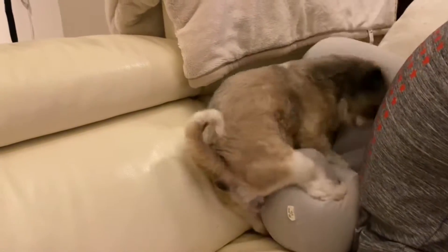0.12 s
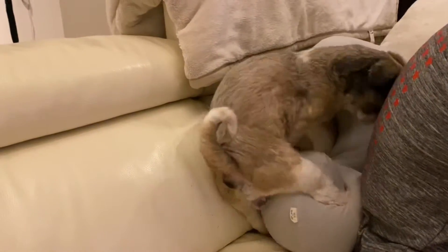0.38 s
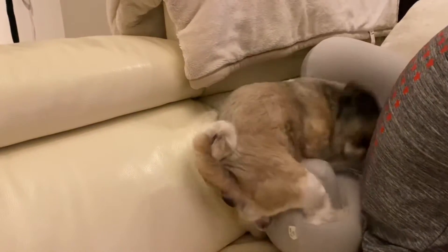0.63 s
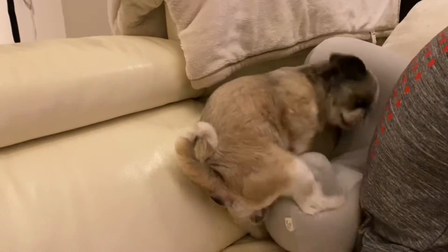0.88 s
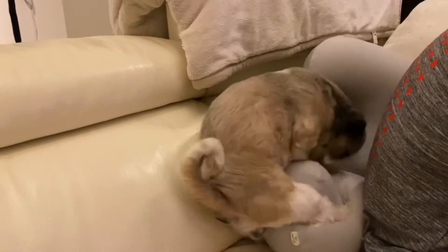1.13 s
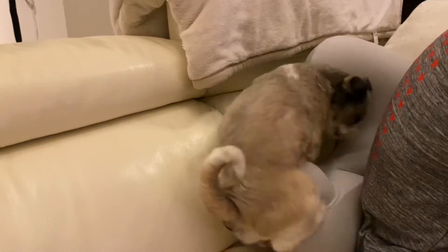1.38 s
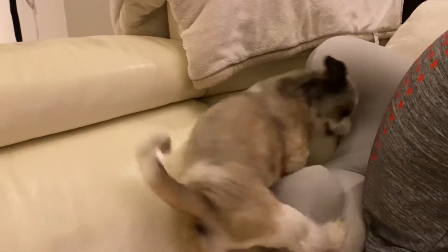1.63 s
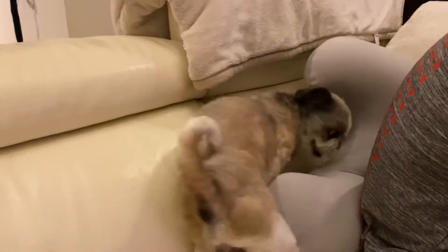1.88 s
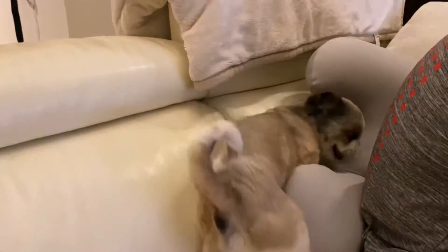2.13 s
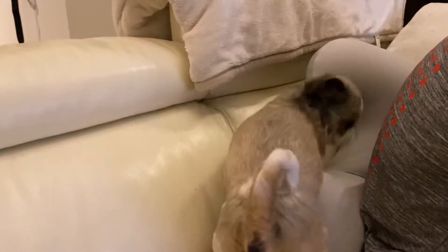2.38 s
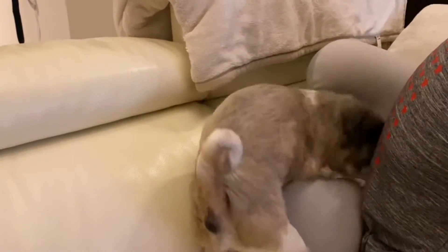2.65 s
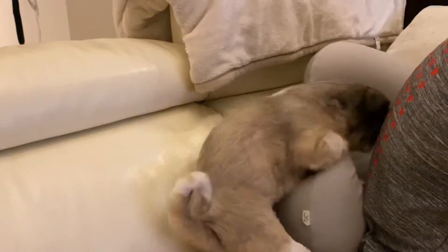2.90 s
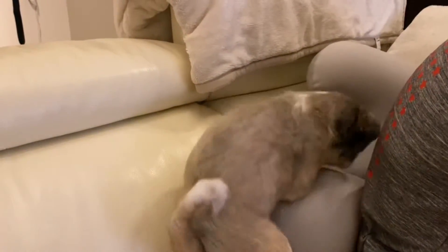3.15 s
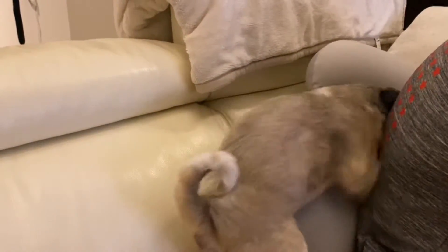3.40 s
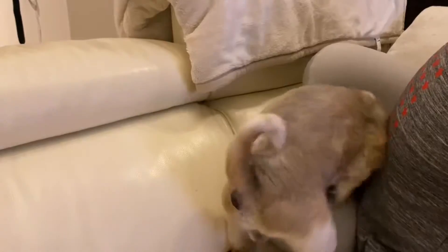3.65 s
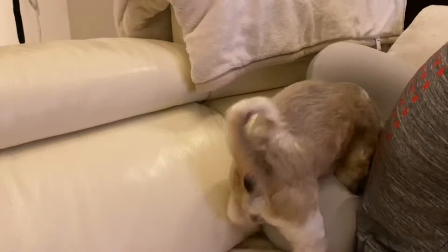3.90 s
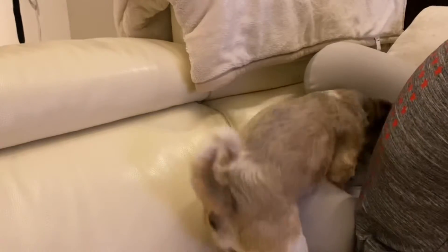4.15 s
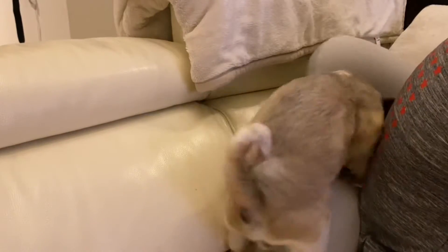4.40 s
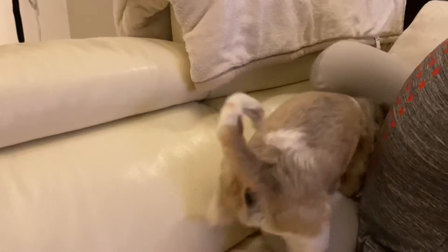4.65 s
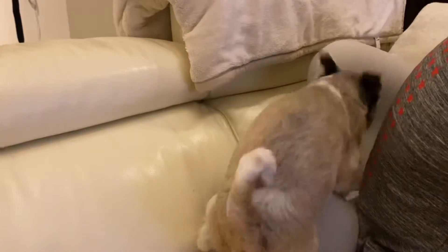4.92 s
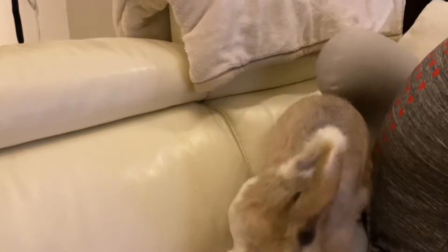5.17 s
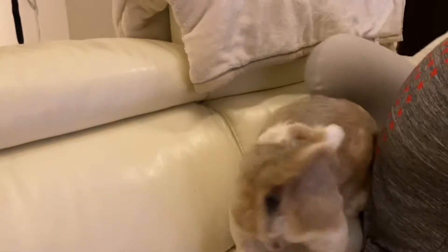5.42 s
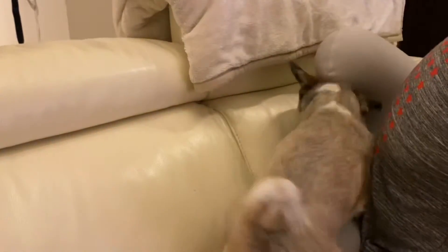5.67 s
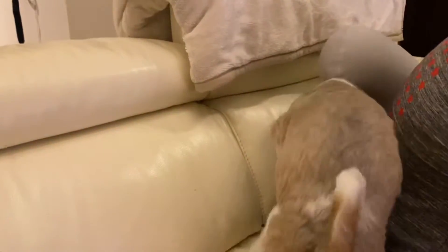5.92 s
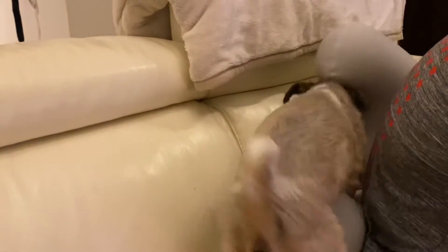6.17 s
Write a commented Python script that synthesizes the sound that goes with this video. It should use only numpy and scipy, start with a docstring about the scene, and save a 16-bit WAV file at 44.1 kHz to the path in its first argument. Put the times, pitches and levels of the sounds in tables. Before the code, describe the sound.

A small dog scrabbles on a leather sofa, close to a phone in a quiet, dry room with faint low noise. From 0.1 s a flurry of dull knocks, each dropping quickly in pitch, mixes with gritty claw catches and a soft nasal huff, easing after 0.5 s, with another small cluster at 0.8 s. Airy fur hiss and muffled leather crumpling swell and fade throughout over the seat's low rumble. Heavier thumps come at 1.6 to 1.8 s with a short huff, a sharper claw knock at 2.4 s, then a dense volley from 2.8 to 3.0 s, ending in a crisp knock, and a huff at 3.1 s. Lighter taps follow at 3.4 to 3.8 s. The strongest, deep thud lands at 4.0 s. Sparser rustling continues, with a knock at 5.2 s, a strong thump at 6.0 s and a last quiet huff at 6.2 s.

```python
"""A small dog paws a cushion on a leather sofa, close to a phone with two microphone ports; 6.3 s.
Throughout: filtered-noise room; seat swaying at low resonances; strokes of fur hiss and leather crumple.
0.1 s: a flurry of falling knocks (decaying sweeps) and claw catches (resonant noise bursts), a nasal huff.
1.6-3.0 s: heavier knocks, a dense volley near 2.9 s, more huffs (noise through two resonances).
4.0 s: the strongest knock; then sparser blows, one strong at 6.0 s, and a last huff at 6.2 s."""
import sys
import numpy as np
from scipy import signal
from scipy.fft import rfft, irfft, next_fast_len
from scipy.io import wavfile
from scipy.ndimage import uniform_filter1d

SR = 44100
rng = np.random.default_rng(int(sys.argv[2]) if len(sys.argv) > 2 else 0)


def log_audio(samples):
    """Write samples as a 16-bit WAV file to the path given in sys.argv[1]."""
    # one column per channel
    frames = np.atleast_2d(samples).T
    # limit to full scale, then quantise
    limited = np.clip(frames, -1, 1)
    pcm = np.round(limited * 32767).astype(np.int16)
    wavfile.write(sys.argv[1], SR, pcm)


def decibels_to_gain(level_db):
    """Convert a level in decibels to a linear amplitude gain (20 dB per decade)."""
    exponent = np.asarray(level_db, float) / 20
    return 10 ** exponent


N = 277609


def evened(x):
    """Scales to rms 1."""
    return x / np.sqrt(np.mean(x ** 2) + 1e-20)


def over_hz(points, hz):
    """Reads a table on a log-frequency axis."""
    f, value = np.transpose(points)
    return np.interp(np.log(hz + 1), np.log(f + 1), value)


def coloured(x, gain):
    """Filters by a gain that is a function of frequency."""
    size = next_fast_len(N + SR)
    hz = np.fft.rfftfreq(size, 1 / SR)
    return irfft(rfft(x, size) * gain(hz), size)[..., :N]


def shaped(x, points):
    """Filters by a table of f/Hz, level/dB; rms 1."""
    return evened(coloured(x, lambda hz: decibels_to_gain(over_hz(points, hz))))


def patchy(x, size, patchy_db, tilt_db, share):
    """Short-time spectra waver in random patches; tilt_db leans them over time, by share in each band."""
    hz, t, z = signal.stft(x, SR, nperseg=size, noverlap=size * 3 // 4)
    patches = rng.standard_normal(z.shape[1:])
    patches = uniform_filter1d(patches, size=8, axis=0)
    patches = evened(uniform_filter1d(patches, size=16, axis=1))
    tilt = np.interp(t, np.arange(N) / SR, tilt_db) * over_hz(share, hz)[:, None]
    z = z * decibels_to_gain(patchy_db * patches + tilt)
    return signal.istft(z, SR, nperseg=size, noverlap=size * 3 // 4)[1][:, :N]


# room and microphone noise spectrum: f/Hz, relative density/dB
ROOM = [(22, -30), (40, -4), (62, 8), (150, -9), (400, -17.5), (1000, -16), (3000, -17), (6000, -29.5),
        (14000, -32)]
ROOM_RMS_DB = -55.5


def room():
    """Steady quiet of the room and the microphone: stationary shaped noise."""
    return decibels_to_gain(ROOM_RMS_DB) * shaped(rng.standard_normal((2, N)), ROOM)


# huffs through the nose: start/s, length/s, level/dB, lower resonance f/Hz, upper resonance relative level/dB
HUFFS = [(0.129, 0.28, -51, 1870, 0), (1.702, .12, -47.5, 2030, -17), (2.32, 0.083, -56, 1880, -2),
         (3.131, 0.11, -50, 1900, -4), (3.804, .08, -61, 1900, -17), (6.204, .09, -55, 1700, -12)]
UPPER_RATIO = 1.95  # upper over lower resonance frequency


def huffs():
    """Air rushing through the nostrils, coloured by two soft resonances."""
    out = np.zeros((2, N))
    for start_s, length_s, db, low_hz, high_db in HUFFS:
        size = round(length_s * SR)
        hz = np.fft.rfftfreq(size, 1 / SR)
        lower = 1 / (1 + ((hz - low_hz) / 300) ** 2)
        upper = decibels_to_gain(high_db) / (1 + ((hz - UPPER_RATIO * low_hz) / 380) ** 2)
        noise = rng.standard_normal((2, SR // 2))[:, :size]
        air = evened(irfft(rfft(noise) * (lower + upper), size))
        out[:, round(start_s * SR):][:, :size] += decibels_to_gain(db) * air * signal.windows.tukey(size, .6)
    return out


# weight shifting on the seat: t/s, level/dB
WEIGHT = [(0.04, -55), (.12, -40), (.3, -43.5), (.4, -39), (.55, -49), (.8, -47.5), (.93, -56),
          (1.2, -45.5), (1.37, -57), (1.52, -39.5), (1.8, -40), (2.05, -55), (2.45, -46.5), (2.85, -36.5),
          (3.15, -44), (3.7, -42), (3.9, -46.5), (4.08, -39), (4.3, -45.5), (4.8, -50.5), (4.9, -46),
          (5.2, -41), (5.33, -45.5), (5.6, -51), (5.95, -46), (6.29, -42)]
SETTLE_DB, SETTLE_T60_S, DEEP_HZ = -19, 0.36, 110  # level re blow peak; decay; blows below DEEP_HZ count


def weight():
    """Slow shifts of weight, plus the settling after deep blows, summed as power: dB."""
    kicks = np.zeros(N)
    for s, db, hz, *_ in BLOWS:
        kicks[round(s * SR)] += decibels_to_gain(db + SETTLE_DB) ** 2 * (hz < DEEP_HZ)
    settling = signal.lfilter([1], [1, -10 ** (-6 / (SETTLE_T60_S * SR))], kicks)
    shifts_db = np.interp(np.arange(N) / SR, *np.transpose(WEIGHT))
    return 10 * np.log10(decibels_to_gain(shifts_db) ** 2 + settling)


# seat resonances: f/Hz, width/Hz, relative level/dB
SEAT = [(63.5, 23.4, 0.5), (100, 29, -1), (133.6, 40, -8), (40, 14, -8)]
SHOVES_PER_S = 300


def sway():
    """Shifting weight keeps shoving the seat, which hums at its low resonances."""
    size = decibels_to_gain(2.1 * np.minimum(rng.exponential(1, N), 4))
    shoves = rng.standard_normal((2, N)) * size * (rng.random(N) < SHOVES_PER_S / SR)
    seat = lambda hz: sum(decibels_to_gain(db) / (1 + 2j * (hz - f) / width) ** 2 for f, width, db in SEAT)
    return evened(coloured(shoves, seat)) * decibels_to_gain(weight())


# paw strokes: peak t/s, fur hiss level/dB, leather crumple level/dB, 10 dB rise/s, 10 dB fall/s
STROKES = [(0.105, -50.6, -41.5, 0.12, 0.151), (0.238, -47.3, -41.5, 0.036, 0.052),
           (0.369, -48.7, -47.9, 0.3, 0.02), (0.426, -42.9, -45.4, 0.035, 0.041),
           (0.491, -66.0, -41.5, 0.137, 0.05), (0.515, -45.1, -45.8, 0.042, 0.261),
           (0.656, -66.0, -46.8, 0.053, 0.027), (0.81, -44.5, -41.6, 0.054, 0.024),
           (0.897, -47.6, -61.1, 0.06, 0.028), (1.017, -45.6, -55.1, 0.074, 0.026),
           (1.06, -47.1, -46.2, 0.075, 0.182), (1.157, -66.0, -46.7, 0.034, 0.186),
           (1.245, -52.6, -41.5, 0.045, 0.023), (1.287, -42.7, -62.5, 0.042, 0.055),
           (1.446, -38.3, -50.8, 0.066, 0.109), (1.547, -66.0, -41.5, 0.103, 0.164),
           (1.644, -40.5, -68.5, 0.042, 0.075), (1.789, -41.2, -42.7, 0.134, 0.074),
           (1.92, -47.1, -50.3, 0.189, 0.125), (2.24, -53.9, -53.2, 0.067, 0.165),
           (2.361, -51.5, -52.6, 0.023, 0.076), (2.442, -50.9, -43.5, 0.037, 0.038),
           (2.52, -50.5, -51.1, 0.044, 0.18), (2.668, -39.7, -45.0, 0.105, 0.056),
           (2.698, -39.2, -49.2, 0.046, 0.015), (2.8, -48.2, -42.6, 0.09, 0.094),
           (2.821, -54.8, -41.5, 0.015, 0.298), (2.976, -44.7, -41.5, 0.039, 0.104),
           (3.073, -41.3, -41.5, 0.123, 0.024), (3.161, -41.8, -41.5, 0.034, 0.254),
           (3.231, -40.2, -51.0, 0.067, 0.041), (3.322, -46.5, -48.0, 0.135, 0.162),
           (3.419, -43.6, -66.6, 0.019, 0.045), (3.585, -41.2, -49.5, 0.107, 0.035),
           (3.69, -64.7, -42.0, 0.275, 0.095), (3.755, -47.3, -58.2, 0.139, 0.053),
           (3.834, -58.2, -50.4, 0.117, 0.078), (3.998, -50.8, -41.5, 0.052, 0.027),
           (4.15, -66.0, -46.7, 0.299, 0.3), (4.285, -44.1, -42.4, 0.077, 0.09),
           (4.401, -46.6, -68.4, 0.196, 0.024), (4.527, -44.0, -47.4, 0.155, 0.052),
           (4.619, -55.3, -52.2, 0.236, 0.165), (4.909, -51.9, -44.4, 0.075, 0.182),
           (5.041, -43.1, -45.2, 0.124, 0.15), (5.176, -46.7, -49.9, 0.173, 0.082),
           (5.205, -59.1, -47.1, 0.049, 0.192), (5.441, -55.5, -56.0, 0.057, 0.214),
           (5.597, -50.7, -57.5, 0.065, 0.081), (5.733, -45.9, -52.5, 0.04, 0.05),
           (5.77, -60.3, -43.2, 0.119, 0.067), (5.878, -43.3, -47.0, 0.112, 0.101),
           (6.02, -47.8, -45.3, 0.064, 0.159), (6.187, -47.4, -45.6, 0.02, 0.14)]
REST_HISS_DB, REST_CRUMPLE_DB = -58.5, -20  # fur between strokes; leather re weight()
ROUNDNESS = 1.5  # 1: pointed swells, 2: bell-shaped


def strokes():
    """Each stroke swells and fades; gives the levels of fur hiss and leather crumple in dB."""
    t = np.arange(0, N, 32) / SR
    s, hiss_db, crumple_db, rise_s, fall_s = np.transpose(STROKES)[:, :, None]
    shape = 10 ** -(abs(t - s) / np.where(t < s, rise_s, fall_s)) ** ROUNDNESS

    def power(db):
        return np.interp(np.arange(N) / SR, t, (decibels_to_gain(db) ** 2 * shape).sum(0))

    hiss = power(hiss_db) + decibels_to_gain(REST_HISS_DB) ** 2
    press = power(crumple_db) + decibels_to_gain(weight() + REST_CRUMPLE_DB) ** 2
    return 10 * np.log10([hiss, press])


# fur hiss spectrum: f/Hz, relative density/dB
HISS = [(700, -6), (1100, -3), (1600, -1.5), (3000, -3), (4500, -3.5), (6000, -3.5), (9000, -2),
        (12000, -1), (14200, 2), (15800, -5)]
# reach of dullness: f/Hz, share/0-1
DULL_SHARE = [(2500, 0.89), (5000, 0.25), (8000, 0.095)]
# dullness of fur against crumple over hiss: offset/dB, slope/(dB/dB)
DULL_RULE = (4.67, 0.35)


def fur():
    """Countless hairs sliding over leather and cloth: a wide fluttering hiss, duller under pressure."""
    hiss_db, crumple_db = strokes()
    dull_db = DULL_RULE[0] + DULL_RULE[1] * (crumple_db - hiss_db)
    flutter = uniform_filter1d(rng.standard_normal(N), size=300)
    flutter = evened(uniform_filter1d(flutter, size=300))
    noise = shaped(rng.standard_normal((2, N)), HISS)
    hiss = patchy(noise, 256, patchy_db=1.33, tilt_db=dull_db, share=DULL_SHARE)
    return hiss * decibels_to_gain(hiss_db + 0.59 * flutter)


# hide response to slips: f/Hz, relative density/dB
LEATHER = [(40, -50), (100, -17), (170, -1), (300, -3), (500, -6.5), (700, -9.5), (1000, -13), (1400, -23),
           (2500, -32.5), (6000, -62)]
# reach of crispness: f/Hz, share/0-1
CRISP_SHARE = [(350, 0.033), (900, 0.63), (2000, 0.61)]
# crispness of hide against crumple over hiss: offset/dB, slope/(dB/dB)
CRISP_RULE = (1.4, -0.51)
SLIPS_PER_S = 1200


def crumple():
    """Small uneven slips of the leather under the paws, each a dull click in the hide."""
    size = decibels_to_gain(2.96 * np.minimum(rng.exponential(1, N), 5)) * (rng.random(N) < SLIPS_PER_S / SR)
    slips = size * rng.choice([-1., 1.], (2, N)) + 0.31 * rng.standard_normal((2, N))
    hide = shaped(slips, LEATHER)
    hiss_db, crumple_db = strokes()
    crisp_db = CRISP_RULE[0] + CRISP_RULE[1] * (crumple_db - hiss_db)
    return patchy(hide, 1024, patchy_db=2.5, tilt_db=crisp_db, share=CRISP_SHARE) * decibels_to_gain(crumple_db)


# claws catching the leather: t/s, peak level/dB, resonance f/Hz
CLAWS = [(.108, -37, 1660), (.16, -40, 1350), (.231, -28, 902), (.251, -34, 961), (.357, -30, 1100),
         (.736, -38, 1800), (.785, -34, 902), (.792, -34, 915), (.804, -34.5, 902), (1.244, -36.5, 1190),
         (1.535, -35, 929), (1.579, -36, 993), (1.602, -37.5, 1000), (1.72, -28.5, 1730),
         (1.768, -31, 1310), (2.068, -42, 2080), (2.326, -33.5, 1800), (2.438, -27, 1230),
         (2.458, -37, 1220), (2.691, -26.5, 930), (2.816, -32, 1010), (2.821, -28, 1020), (2.965, -31, 890),
         (2.976, -34, 1040), (2.986, -21.5, 961), (3.142, -35, 1360), (3.367, -36, 993), (3.378, -34, 902),
         (3.411, -39, 1150), (3.713, -38, 931), (3.965, -39, 902), (3.977, -40, 1400), (4.002, -31, 1300),
         (4.01, -37, 1900), (4.659, -41, 902), (5.059, -32, 1200), (5.234, -34.5, 1120),
         (5.881, -33.5, 947), (6.011, -37.5, 1850), (6.019, -29.5, 1000), (6.174, -45, 1250)]
CATCH_MS = 0.94  # grit envelope, time to peak


def claws():
    """Each catch is a short burst of grit through a broad resonance, dull above it."""
    t, out = np.arange(SR // 40) / SR, np.zeros(N + SR)
    u = t * 1000 / CATCH_MS
    for (s, db, hz), grit in zip(CLAWS, rng.standard_normal((len(CLAWS), len(t)))):
        r = np.exp(-np.pi * .7 * hz / SR)  # bandwidth 0.7 of f
        poles = [1, -2 * r * np.cos(2 * np.pi * hz / SR), r * r]
        rung = signal.lfilter([1], poles, grit * u * np.exp(1 - u))
        out[round(s * SR):][:len(t)] += decibels_to_gain(db) * rung / abs(rung).max()
    return out[:N]


# paw blows: t/s, peak level/dB, settled f/Hz, starting pitch/settled pitch, time to peak/ms
BLOWS = [(0.086, -23, 91, 4.4, 2.7), (0.096, -29, 300, 1.3, 3.9), (0.112, -24.5, 221, 0.87, 3),
         (0.159, -30, 610, 1.2, 2.5), (0.2333, -27, 185, 4.5, 6), (0.2515, -27, 485, 1.1, 0.86),
         (0.3501, -32, 170, 4.7, 2.3), (0.3588, -24, 137, 4.6, 3.2), (0.384, -36, 54.3, 1, 13),
         (0.45, -36, 271, 1.2, 8.7), (0.475, -37, 284, 0.91, 8.9), (0.515, -36, 268, 1.05, 6.3),
         (0.59, -38, 65, 1.5, 10), (0.7383, -30, 131, 5.1, 2.5), (0.7866, -30, 195, 2.2, 6),
         (0.8045, -29, 342, 3.8, 1), (0.813, -32, 71, 5.5, 9.6), (1.1463, -28, 250, 1.8, 1.6),
         (1.2542, -28, 91.5, 3.1, 5), (1.502, -28.5, 65, 3.4, 20), (1.5356, -36, 760, 1.1, 1.6),
         (1.552, -35, 570, 1.6, 2), (1.58, -25.5, 200, 1.5, 1.2), (1.6183, -20, 54.6, 3.05, 5.2),
         (1.6672, -30, 65.6, 1.64, 16), (1.7692, -19, 162, 4.8, 5.5), (1.777, -22, 62.4, 1.8, 20),
         (1.9392, -34, 65, 2.3, 8.4), (1.965, -32.5, 120, 2.1, 3.2), (2.2587, -40, 129, 5.4, 6.5),
         (2.4405, -21.5, 497, 0.96, 0.77), (2.548, -33.5, 59.6, 2.05, 11), (2.6905, -44, 497, 2.8, 3.9),
         (2.75, -29.5, 70, 4.4, 14), (2.822, -26, 171, 4.5, 4.7), (2.83, -22.5, 199, 4.16, 2.5),
         (2.834, -16, 95, 2.4, 7.5), (2.858, -21.5, 100, 1.85, 4.2), (2.8839, -28.5, 62, 1.6, 15),
         (2.9658, -25, 283, 7.1, 3), (2.976, -25, 330, 5, 2.9), (2.987, -25, 564, 4.4, 1.1),
         (2.9907, -14.5, 520, 1.13, 1), (2.996, -26, 89, 2.86, 7.9), (3.007, -23, 73, 1.66, 6),
         (3.369, -34, 120, 2.6, 2.7), (3.3792, -24.5, 230, 4.3, 1.7), (3.38, -30, 60, 1.84, 4.5),
         (3.4186, -28.5, 77.4, 2.2, 3), (3.579, -30.5, 50, 2.1, 5.8), (3.7148, -27.5, 350, 2.25, 0.98),
         (3.8497, -29, 58.7, 3.8, 3.9), (3.949, -36, 72, 4.2, 15), (3.9769, -36, 560, 0.9, 2.3),
         (4.003, -19, 110, 3, 4.5), (4.0123, -12, 72, 3.4, 7), (4.044, -25, 75, 1.7, 4.9),
         (4.6613, -32, 150, 6, 3.1), (4.869, -38, 62, 2.5, 22), (5.105, -39, 68, 2.1, 5.3),
         (5.1866, -34, 93, 1, 17), (5.2423, -22, 77, 2.3, 4), (5.3327, -40, 186, 5.2, 3.3),
         (5.4755, -40, 60, 3, 7.9), (5.78, -35, 225, 1.3, 12), (6.0181, -16, 95.4, 5.6, 10.5),
         (6.0434, -22, 54.6, 2.5, 7.2), (6.1955, -38, 53.3, 0.89, 27)]
FALL_CYCLES = 0.357  # time constant of the pitch glide, in settled cycles


def blows():
    """A knock in taut leather: high waves outrun the low ones, so its pitch glides to a settled one."""
    t, out = np.arange(SR // 5) / SR, np.zeros(N + SR)
    for (s, db, hz, start, peak_ms), phase in zip(BLOWS, rng.random((len(BLOWS), 1))):
        fall_s = FALL_CYCLES / hz
        u = t * 1000 / peak_ms
        turns = hz * (t + (start - 1) * fall_s * (1 - np.exp(-t / fall_s)))
        knock = u * np.exp(1 - u) * np.cos(2 * np.pi * (turns + phase))
        out[round(s * SR):][:len(t)] += decibels_to_gain(db) * knock
    return out[:N]


SCATTER_DB, SCATTER_T60_S, SCATTER_LOW_HZ = -7.0, 0.043, 380


def scattered(x):
    """Both ports hear a hit directly; near cushions add a different scatter above the bass to each."""
    t = np.arange(SR // 20) / SR
    echoes = rng.standard_normal((2, len(t))) * decibels_to_gain(-60 * t / SCATTER_T60_S)
    scatter = signal.oaconvolve(x[None], echoes / np.linalg.norm(echoes[0]), axes=1)[:, :N]
    above_bass = lambda hz: 1 / np.sqrt(1 + (SCATTER_LOW_HZ / (hz + 1)) ** 4)
    return x + decibels_to_gain(SCATTER_DB) * coloured(scatter, above_bass)


# likeness of the two channels: f/Hz, likeness/0-1
SAME = [(40, .99), (100, .997), (300, .93), (600, .78), (1000, .56), (1600, .72), (3800, .74), (5000, .06),
        (5900, 0), (6500, .3), (7000, .98)]


def paired(x):
    """The second channel carries the first sound plus, by band, an unrelated one."""
    same = lambda hz: np.clip(over_hz(SAME, hz), 0, 1)
    other = lambda hz: np.sqrt(1 - same(hz) ** 2)
    return np.array([x[0], coloured(x[0], same) + coloured(x[1], other)])


def scene():
    """All sources in two channels."""
    hits = scattered(blows() + claws())
    return hits + paired(fur() + crumple() + sway() + huffs() + room())


def roll_off(x):
    """The treble ends steeply here."""
    return signal.sosfilt(signal.butter(12, 16780, fs=SR, output="sos"), x)


# left over right channel: f/Hz, level/dB
LEAN = [(200, 0), (350, 1.5), (600, -5.5), (900, 0), (2000, 0.4), (4300, 6), (5800, 1.5), (7500, 0.4)]
RIGHT_ADVANCE_S, FLIP_HZ, EDGE_HZ = 225e-6, 5400, 15790  # treble processing above FLIP_HZ; top edge


def record(dry):
    """Left and right differ in colour; treble processing inverts the right channel and advances it slightly."""
    half_lean = lambda hz: over_hz(LEAN, hz) / 2
    turn = lambda hz: np.where(hz > FLIP_HZ, -np.exp(2j * np.pi * hz * RIGHT_ADVANCE_S), 1)
    left = coloured(dry[0], lambda hz: decibels_to_gain(half_lean(hz)) * (hz < EDGE_HZ))
    right = coloured(dry[1], lambda hz: decibels_to_gain(-half_lean(hz)) * turn(hz) * (hz < EDGE_HZ))
    return roll_off(np.array([left, right]))


dry = scene()
out = record(dry)
log_audio(out)
```